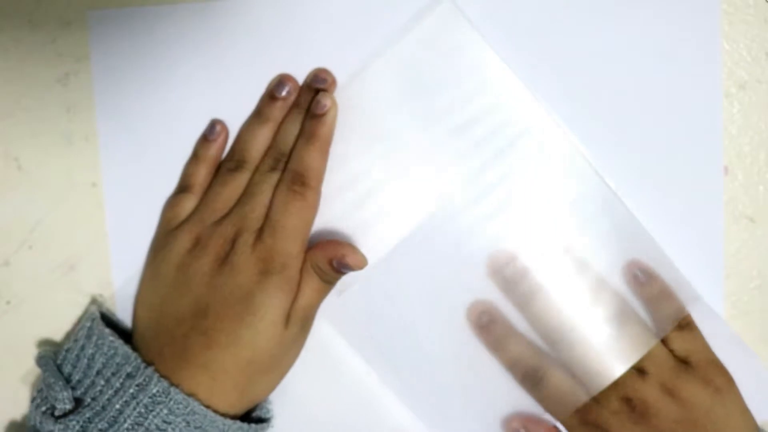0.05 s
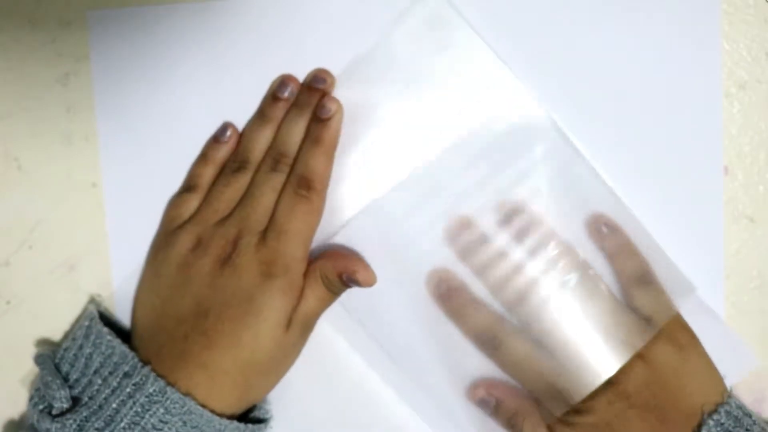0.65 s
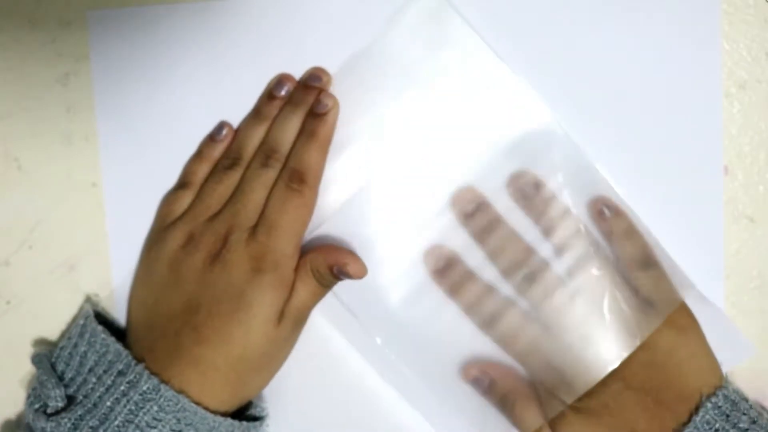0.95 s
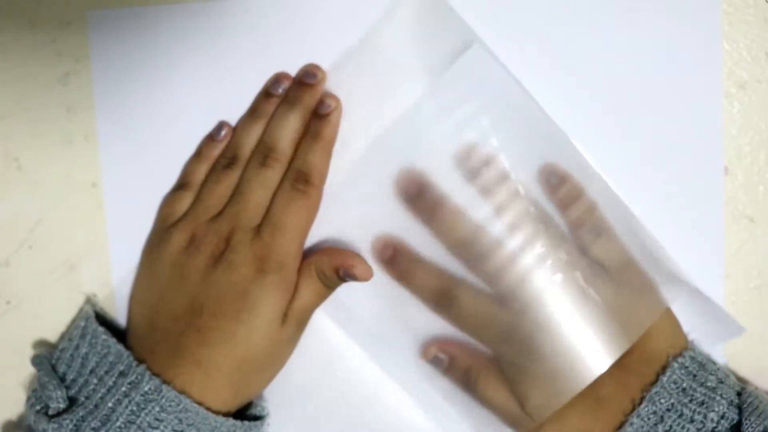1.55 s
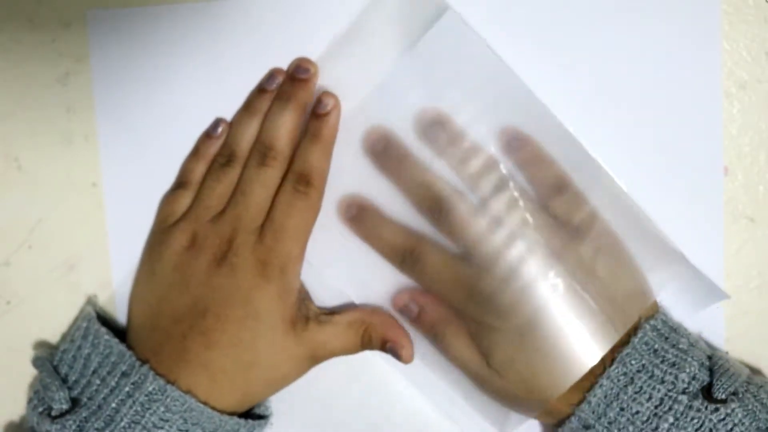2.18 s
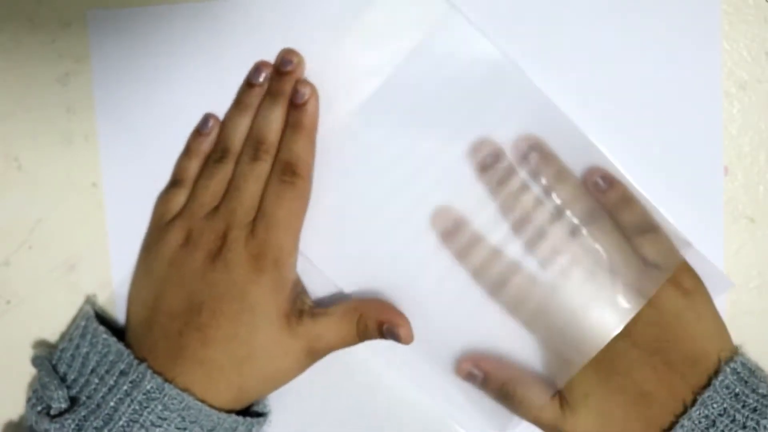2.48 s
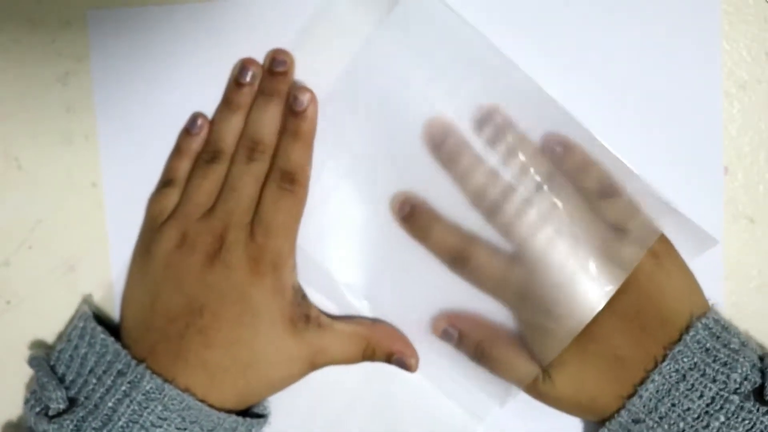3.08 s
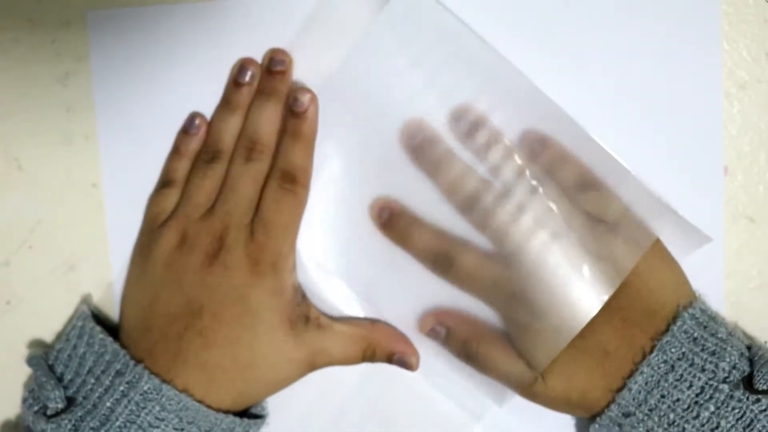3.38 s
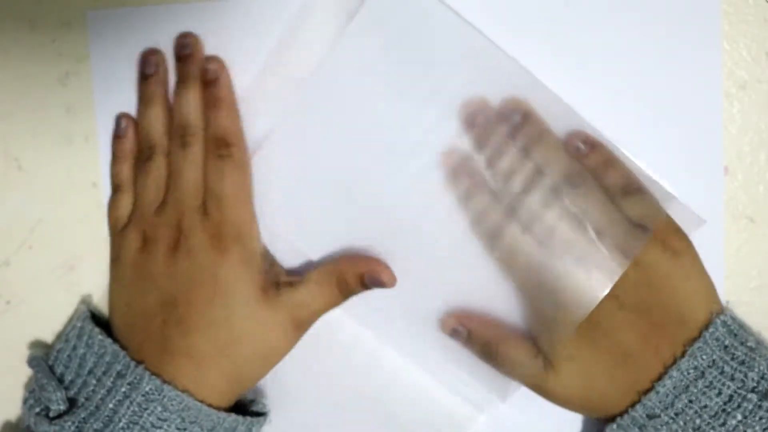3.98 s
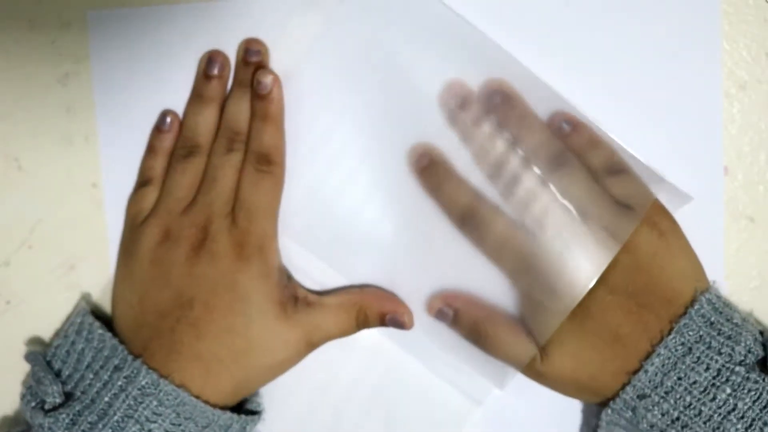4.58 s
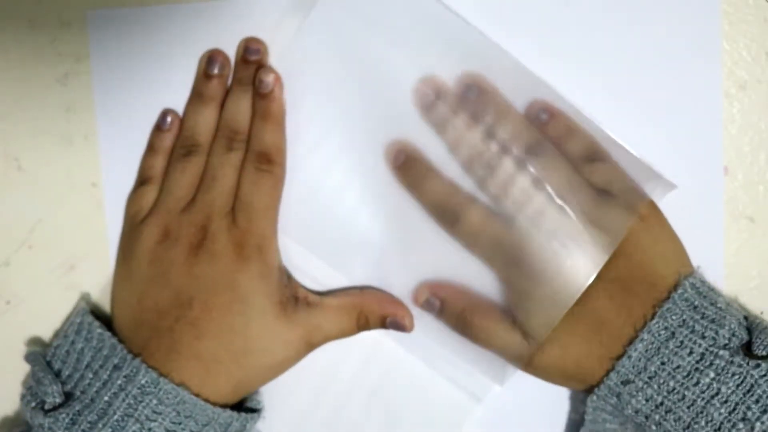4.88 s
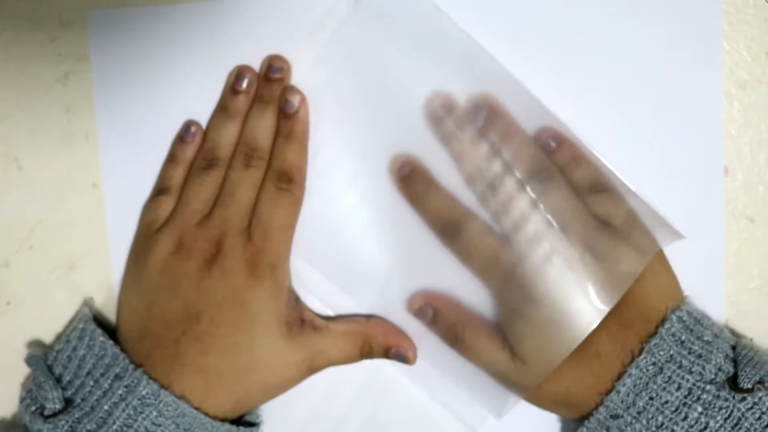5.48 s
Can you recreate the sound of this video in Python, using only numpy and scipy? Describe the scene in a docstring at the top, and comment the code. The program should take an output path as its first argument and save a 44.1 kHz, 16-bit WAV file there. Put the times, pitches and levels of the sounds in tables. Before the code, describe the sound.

A hand pushes into a tight plastic pocket on a desk, heard in close stereo in a small quiet room with a short echo and faint low background noise. For about five and a half seconds, skin rubs on film in short, uneven, grainy hissing shoves, several a second. The stiff film snaps sharply at 0.1 seconds. The rubbing is strongest from 0.5 to 0.9 seconds, ending in a loud snap. From 1.2 to 2.5 seconds, smaller crackles cluster with soft flaps of slack plastic, and the hand bumps the desk dully at 2.1. After a quieter stretch, the sharpest crack comes at 3.1 seconds. A fingertip gives one faint, rough, rising squeak near 3.75, followed by a soft flap at 4. Another snap lands with a low thud at about 4.5. A further shove follows near 4.9, then lighter rubbing and a last small snap around 5.6 seconds.

```python
"""A hand works its way into a tight plastic laminating pocket lying on paper on a desk.
Every shove rubs skin and film together in a grainy hiss; the stiff film buckles with sharp snaps
and its slack parts flap. The hand bumps the desk, and a fingertip sticks and slips in one squeak.
The stereo microphone is close by on the desk, in a small quiet room with a short echo."""
import sys
import numpy as np
from scipy import signal
from scipy.fft import rfft, irfft, next_fast_len
from scipy.io import wavfile
from scipy.ndimage import uniform_filter1d, map_coordinates

SR = 44100
rng = np.random.default_rng(int(sys.argv[2]) if len(sys.argv) > 2 else 0)


def store_pcm(level_fs):
    """Save levels as 16-bit WAV."""
    pcm = np.round(np.clip(level_fs, -1, 1) * 32767).astype(np.int16)
    wavfile.write(sys.argv[1], SR, np.atleast_2d(pcm).T)


N = 248796

# resonances of the plastic film [f/Hz, width/Hz, level/dB]
FILM_MODES = [(1050, 140, -4.5), (1392, 101, 3.5), (1540, 34, -28), (1698, 265, 2), (1980, 490, 6),
              (2326, 710, 4.5), (2666, 210, 5), (2870, 110, -2)]


def amp(db):
    """Decibels to gain."""
    return 10 ** (np.asarray(db) / 20)


def unit(x):
    """Scale to rms 1."""
    return x / np.sqrt(np.mean(x ** 2) + 1e-20)


def along(points, hz):
    """Read (f/Hz, value) points on a log frequency axis."""
    f, values = np.transpose(points)
    return np.interp(np.log(hz + 1), np.log(f + 1), values)


def curves(rows):
    """One value per sample for each column after the time."""
    times, *columns = np.transpose(rows)
    return [np.interp(np.arange(N) / SR, times, column) for column in columns]


def wobble(rate):
    """A smooth random curve, rate knots a second."""
    knots = rng.standard_normal(int(N * rate / SR) + 4)
    return map_coordinates(knots, [np.arange(N) * rate / SR])


def filtered(x, response):
    """Filter x by a complex function of frequency."""
    n = x.shape[-1]
    padded = 2 * next_fast_len(n // 2 + SR // 20)
    return irfft(rfft(x, padded) * response(np.fft.rfftfreq(padded, 1 / SR)), padded)[..., :n]


def causal(gain):
    """The minimum-phase response that has this gain."""
    cepstrum = irfft(np.log(np.maximum(gain, 1e-6)))
    half = len(cepstrum) // 2
    return np.exp(rfft(np.r_[cepstrum[0], 2 * cepstrum[1:half], np.zeros(half)]))


def resonate(modes, hz):
    """Gain of (f/Hz, width/Hz, level/dB) resonances, summed with alternating signs."""
    return abs(sum((-1) ** k * amp(db) * 1j * hz * width / (f * f - hz * hz + 1j * hz * width)
                   for k, (f, width, db) in enumerate(modes)))


def add(track, s, sound):
    """Mix a sound into the track at time s."""
    start = max(round(s * SR), 0)
    part = track[..., start:start + sound.shape[-1]]
    part += sound[..., :part.shape[-1]]


def stereo(pair):
    """Two unrelated signals become left and right: alike in the bass, less so in the treble."""
    # likeness of the two microphone channels [f/Hz, correlation]
    likeness = [(40, 0.82), (250, 0.72), (2000, 0.81), (4000, 0.49), (8000, 0.29), (13000, 0.13)]
    angle = lambda hz: np.arccos(along(likeness, hz)) / 2
    mid, side = filtered(pair, lambda hz: np.array([np.cos(angle(hz)), np.sin(angle(hz))]))
    return np.array([mid + side, mid - side])


def room(x, wet_db, tail_delay_s=.003, wall_delay_s=.0105, wall_db=-23.5):
    """The direct sound, its bounce off the nearest wall and the small room's diffuse echo."""
    # decay time of the room [f/Hz, t60/s]
    decay = [(150, 0.49), (600, 0.28), (2000, 0.11), (6000, 0.059), (14000, 0.04)]
    hz, t, noise = signal.stft(rng.standard_normal((2, 11000)), SR, nperseg=256)
    fading = noise * amp(-60 * t / along(decay, hz)[:, None])
    tail = stereo(signal.istft(fading, SR, nperseg=256)[1])
    tail = np.pad(tail / np.linalg.norm(tail[0]), ((0, 0), (round(tail_delay_s * SR), 0)))
    out = amp(wet_db) * signal.fftconvolve(x.mean(0)[None], tail, axes=1)
    add(out, 0, x)
    add(out, wall_delay_s, amp(wall_db) * x)
    return out


def room_tone(db=-57):
    """The steady, low background of the quiet room."""
    # spectrum of the background [f/Hz, level/dB]
    spectrum = [(15, -53), (25, -17.5), (111, -7), (145, -4.5), (229, -11.5), (317, -10.5), (516, -13.5),
                (575, -16.5), (641, -16), (1740, -22.5), (1890, -34), (2280, -32), (11600, -36),
                (16000, -48)]
    noise = stereo(rng.standard_normal((2, N)))
    return amp(db) * unit(filtered(noise, lambda hz: amp(along(spectrum, hz))))


def shoving(attack_s=.021, release_s=.015, rest_rub_db=-63.5, rest_hiss_db=-64):
    """Rub level and hiss relative to it, in dB: each shove gathers speed, holds and runs out."""
    # pushes of the hand [t/s, hold/s, level/dB, hiss re rub/dB, swell over the hold/dB]
    shoves = [(0.124, 0.094, -40.0, -6.5, -1.5), (0.356, 0.01, -43.5, -6, -3), (0.544, 0.024, -30, -7, 0.5),
              (0.601, 0.125, -35, -8, 2.5), (0.846, 0.049, -34.5, -7.5, 10.5),
              (1.097, 0.092, -35.5, -5, -6), (1.232, 0.051, -37.0, -9, 6), (1.377, 0.082, -37.8, -4, -4.5),
              (1.538, 0.021, -42, -4.5, 2), (1.657, 0.044, -41.5, -7.5, -1.5),
              (1.779, 0.031, -41, -3.5, 0.5), (1.879, 0.019, -42, -5.5, 5), (1.999, 0.026, -40.5, -1.9, -3),
              (2.08, 0.16, -40.5, -4, -1.5), (2.33, 0.082, -47.5, 2.5, 5.5),
              (2.427, 0.076, -41.5, -2.5, -2.5), (2.582, 0.16, -48, -4, 2),
              (2.756, 0.079, -48.5, -4.5, -11.5), (2.879, 0.027, -47.9, -6.5, 8),
              (2.985, 0.044, -40, -3, 4), (3.09, 0.078, -36.5, -5.5, 3.5), (3.197, 0.084, -42, -8, 5),
              (3.386, 0.04, -43, -5.5, -7), (3.444, 0.11, -43.3, -5.4, 5.5), (3.585, 0.062, -39.5, -5, 2.5),
              (3.719, 0.023, -41.5, -5.5, 3), (3.874, 0.087, -46.5, -4, 15), (3.981, 0.13, -42.1, -4, -6),
              (4.165, 0.056, -47, -3.5, 4.5), (4.3, 0.036, -50.1, -5, -5), (4.417, 0.05, -36, -8.5, 8.5),
              (4.547, 0.018, -43, -7, 3.5), (4.642, 0.034, -42.6, -7.5, 7.5), (4.725, 0.01, -41, -6.5, -3),
              (4.851, 0.045, -34.5, -8, 2), (5.121, 0.12, -47, -0.3, -9), (5.329, 0.11, -44, -5, -15.5),
              (5.446, 0.052, -53, -8.5, 6), (5.546, 0.048, -44, -11, -0.5)]
    t = np.arange(N) / SR
    rub, hiss = np.zeros((2, N))
    for s, hold, db, hiss_db, swell_db in shoves:
        near = slice(*np.searchsorted(t, [s - .2, s + hold + .2]))
        age = t[near] - s
        # the hand breaks loose abruptly and runs out more slowly
        attack = np.maximum(-age / attack_s, 0) ** 2.7
        release = np.maximum((age - hold) / release_s, 0) ** 1.69
        strength = amp(db + swell_db * (np.clip(age / hold, 0, 1) - .5)) / (1 + attack + release)
        rub[near] = np.maximum(rub[near], strength)
        hiss[near] = np.maximum(hiss[near], strength * amp(hiss_db))
    # it never comes fully to rest
    rub, hiss = np.hypot(rub, amp(rest_rub_db)), np.hypot(hiss, amp(rest_hiss_db))
    return 20 * np.log10(rub), 20 * np.log10(hiss / rub)


def slips(per_s, spread_db, smooth):
    """Tiny stick-slip releases of uneven size over smooth friction noise, rms 1."""
    sizes = amp(spread_db * np.minimum(rng.standard_normal((2, N)), 2))
    signs = rng.choice([-1, 1], (2, N))
    grains = unit(sizes * signs * (rng.random((2, N)) < per_s / SR))
    return unit(grains + smooth * rng.standard_normal((2, N)))


def rubbing(crackle_db=-10):
    """Skin slips on film and shakes its resonances; the finest slips hiss above them."""
    # spectrum of the coarse friction [f/Hz, level/dB]
    rub_spectrum = [(40, -35), (150, -5.5), (500, -5), (850, -3), (1150, 0.5), (2000, 2.5), (2800, 2),
                    (3500, -1), (6000, -34), (16000, -84)]
    # spectrum of the fine friction [f/Hz, level/dB]
    hiss_spectrum = [(1500, -9.5), (2800, 0.5), (3800, 0.5), (4500, 0), (5150, -2), (5700, -4),
                     (6450, -1.5), (8200, -5.5), (10400, -9), (11300, -12), (12000, -13.5), (14500, -19),
                     (16000, -29)]
    # tension of the film around the hand [t/s, tautness 0-1]
    tension = [(0, 0.36), (1.2, 0.25), (2.4, 0.3), (2.75, 0.33), (3.6, 0.66), (4, 0.14), (4.3, 0.6),
               (5.6, .7)]
    rub_db, hiss_db = shoving()
    # creases catch and let go with a tiny crackle
    crackle = amp(crackle_db) * slips(per_s=55, spread_db=3, smooth=0)
    force = stereo(slips(per_s=600, spread_db=5, smooth=.7) + crackle)
    film = lambda hz: causal(amp(along(rub_spectrum, hz)) * (.67 + resonate(FILM_MODES, hz)))
    body = filtered(force, film)
    # tauter film sounds higher
    taut = curves(tension)[0]
    high = filtered(body, lambda hz: along([(1400, .18), (2400, .71)], hz))
    body = unit((1 - taut) * (body - high) + taut * high)
    fine_force = stereo(slips(per_s=2200, spread_db=5.5, smooth=1.52) + .5 * crackle)
    hiss = unit(filtered(fine_force, lambda hz: amp(along(hiss_spectrum, hz))))
    # a smooth glide hisses more and higher than a catching one
    top = filtered(hiss, lambda hz: along([(6000, .25), (12000, .8)], hz))
    hiss += top * (amp(.5 * (hiss_db + 6)) - 1)
    judder = wobble(70)
    body *= amp(rub_db - 1.6 + 1.75 * judder)
    hiss *= amp(rub_db + hiss_db + 2.5 + .78 * judder + wobble(110))
    return room(body + hiss, wet_db=-11.5)[:, :N]


def buckle(ring_hz, knock_db, crack_db, tick_db, edge_hz, size=4096):
    """One snap of energy 1: bending waves scatter across the film for a few milliseconds."""
    rise_s, scatter_t60_s, travel_s = .00019, .014, .000459
    t, hz = np.arange(size) / SR, np.fft.rfftfreq(size, 1 / SR)
    envelope = (1 - np.exp(-t / rise_s)) * amp(-60 * t / scatter_t60_s)
    waves = rfft(rng.standard_normal((2, size)) * envelope)
    # the release feeds all wavelengths evenly
    flatten = np.array([causal(abs(uniform_filter1d(abs(w) ** 2, size=45)) ** -.5) for w in waves])
    # long bending waves run slower: the delay goes as one over the root of frequency
    dispersion = np.exp(-4j * np.pi * travel_s * np.sqrt(ring_hz * hz))
    # [f/Hz, level/dB]; a harder tick reaches further into the treble
    colour = [(30, knock_db - 28), (160, knock_db - 4), (550, knock_db + 6.5), (820, knock_db + 2.5),
              (1100, -1), (1550, -1), (1850, crack_db), (edge_hz, crack_db - 3),
              (1.21 * edge_hz, tick_db + 7), (7000, tick_db),
              (10000, 1.35 * tick_db - 3), (16000, 1.6 * tick_db - 25)]
    # the buckled patch rings at its own pitch, and the whole sheet adds its hollow colour
    patch_db = 6 / (1 + ((hz - ring_hz) / 170) ** 2)
    sheet_db = 4 * (resonate(FILM_MODES, hz) - .4)
    tone = causal(amp(along(colour, hz) + patch_db + sheet_db))
    snap = stereo(irfft(waves * flatten * dispersion * tone))
    return snap / np.sqrt(np.sum(snap ** 2) / 2)


def film_snaps(level_span_s=.0096, build_up_s=.0004):
    """The stiff film buckles close to the microphone, and each snap rings on in the room."""
    # buckles of the film; knock, crack and tick weight the lows, upper mids and treble
    # [t/s, level/dB, ring f/Hz, knock/dB, crack/dB, tick/dB, upper edge of the crack f/Hz]
    buckles = [(.0805, -43.5, 1830, -12, -2, -4, 2830), (.0974, -19, 1950, -10, 5.5, -10, 2730),
               (.3412, -42.5, 1320, -28, -7, -19, 2800), (0.3635, -39, 1840, -36, 10, -14, 2670),
               (0.8219, -35.5, 1300, -6, -13, -30, 2400), (.878, -15.5, 1420, -7, 2, -9.5, 2860),
               (0.9705, -37, 1325, -9.5, -5, -47, 2360), (1.245, -25.5, 1300, -1, 1.5, -21, 3780),
               (1.3822, -28, 1300, -10, -15, -37, 2800), (1.5589, -26.5, 1190, -5.5, -3, -25.5, 2620),
               (1.6958, -21, 1910, -7.5, -3, -38, 3750), (1.784, -24.5, 1430, -22, -3, -31, 2470),
               (1.7971, -26.5, 1330, -9.5, -2, -24, 2350), (1.888, -38.5, 2450, -10, -2, -6, 2800),
               (1.9596, -25.5, 1360, -13.5, -0.5, -11.5, 2910),
               (2.0724, -24, 1070, -21.5, -10.5, -17, 3280), (2.1152, -23.5, 1400, -10, 1.5, -21, 2820),
               (2.205, -29.5, 1950, -12, 0, -9, 3200), (2.319, -35.5, 1320, -10, -7, -1, 2900),
               (2.425, -24.5, 1220, -13, -5.5, -24, 2870), (3.0909, -14, 2500, -17, 2, -6.5, 2650),
               (3.2743, -34, 1990, -5, 7, -7, 2820), (3.5461, -39.5, 915, 3, -13, -10, 2800),
               (3.8232, -35.5, 1080, -7, -4, -29, 2250), (3.966, -36, 1320, -7.5, -13, -9, 2800),
               (4.012, -37, 1370, -18, -13, -22, 2800), (4.0484, -33, 1350, -7, -29, -32, 2800),
               (4.406, -39.5, 1320, -7.5, -7, -18, 2830), (4.4597, -18, 2100, -8.5, -3.5, -16.5, 2750),
               (4.6708, -39.5, 2080, -14, 8, -12, 2800), (4.9153, -36.5, 2680, -16, -1, -14, 2800),
               (5.1226, -30.5, 1330, -6.5, -9, -7, 2800), (5.5889, -37, 1930, -14, -1, -18, 2920),
               (5.6214, -26, 2650, -13, 5, -22, 3150)]
    out = np.zeros((2, N))
    for s, db, *tone in buckles:
        snap = amp(db) * np.sqrt(level_span_s * SR) * buckle(*tone)
        add(out, s - build_up_s, room(snap, wet_db=-12))
    return out


def soft_blow(track, s, db, rise_s, t60_s, low_hz, high_hz, steep, size=16384):
    """Mix in a dull burst of noise that swells 10 dB per rise_s, peaks at time s and dies away."""
    t = (np.arange(size) - size // 4) / SR
    band = lambda hz: 1 / np.sqrt((1 + (low_hz / (hz + 1)) ** 10) * (1 + (hz / high_hz) ** steep))
    shake = unit(filtered(stereo(rng.standard_normal((2, size))), band))
    envelope = amp(db + np.minimum(10 * t / rise_s, -60 * t / t60_s))
    add(track, s + t[0], shake * envelope)


def desk_bumps(direct=.57, resonance_db=-1):
    """The hand bumps the desk, whose low resonances colour each thud."""
    # blows of the hand [t/s, level/dB, upper edge f/Hz, rise/s]
    bumps = [(.1, -46, 240, 0.004), (2.1, -34.5, 387, 0.0031), (2.51, -44, 190, .0074),
             (3.547, -44, 400, 0.0031), (3.62, -50.5, 220, 0.029), (4.24, -49, 330, 0.014),
             (4.462, -35, 240, 0.02), (4.86, -46.5, 240, .07)]
    # resonances of the desk [f/Hz, width/Hz, level/dB]
    desk_modes = [(142, 36, -2), (188, 24, 0.5), (330, 44, 0.5)]
    thuds = np.zeros((2, N))
    for s, db, high_hz, rise_s in bumps:
        soft_blow(thuds, s, db, rise_s, t60_s=.19, low_hz=82, high_hz=high_hz, steep=5.7)
    return filtered(thuds, lambda hz: causal(direct + amp(resonance_db) * resonate(desk_modes, hz)))


def film_flaps():
    """Slack parts of the film flap with soft midrange bursts."""
    # flaps of the film [t/s, level/dB, rise/s, t60/s]
    flaps = [(.885, -43, 0.005, 0.21), (1.257, -29.5, 0.0037, 0.21), (1.385, -35, .006, .1),
             (1.525, -40.5, .005, .1), (1.705, -32.5, 0.0055, 0.15), (1.8, -30, 0.014, .15),
             (2.185, -43, .005, 0.15), (2.508, -40, 0.009, 0.21), (3.015, -39, .01, 0.1),
             (4.052, -35.5, .03, 0.32), (4.472, -32, 0.019, 0.061)]
    out = np.zeros((2, N))
    for s, db, rise_s, t60_s in flaps:
        soft_blow(out, s, db, rise_s, t60_s, low_hz=306, high_hz=1460, steep=13)
    return out


def fingertip_squeak(jitter=.039, roughness=.41):
    """Nearly regular slips of a fingertip give a short, rough rising tone."""
    # course of the squeak [t/s, f/Hz, level/dB]
    glide = [(3.73, 380, -80), (3.745, 400, -44.5), (3.765, 444, -49.5), (3.78, 487, -52), (3.8, 520, -59),
             (3.81, 520, -85)]
    pitch_hz, db = curves(glide)
    phase = 2 * np.pi * np.cumsum(pitch_hz * (1 + jitter * wobble(200))) / SR
    tone = np.sin(phase) + .1 * np.sin(2 * phase)
    rough_tone = unit(tone * (1 + roughness * wobble(180)))
    t = np.arange(N) / SR
    return amp(db) * rough_tone * (t > glide[0][0]) * (t < glide[-1][0])


def scene():
    """Film, hand and desk close up, over the room's background."""
    return film_flaps() + desk_bumps() + rubbing() + film_snaps() + fingertip_squeak() + room_tone()


def record(dry, left_lead_s=.000018, ceiling=.9, top_hz=16000):
    """The left microphone is slightly nearer and brighter; peaks clip, then the top is cut off."""
    # balance of the microphones [f/Hz, left minus right level/dB]
    balance = [(60, 2), (350, 0.1), (700, 2.5), (1300, 1.5), (2300, -0.9), (4400, 2.5), (8000, 4),
               (14000, 9)]
    sides = np.array([[.5], [-.5]])
    mics = lambda hz: amp(sides * along(balance, hz)) * np.exp(2j * np.pi * hz * left_lead_s * sides)
    clipped = np.clip(filtered(dry, mics), -ceiling, ceiling)
    return filtered(clipped, lambda hz: hz < top_hz)


dry = scene()
out = record(dry)
store_pcm(out)
```